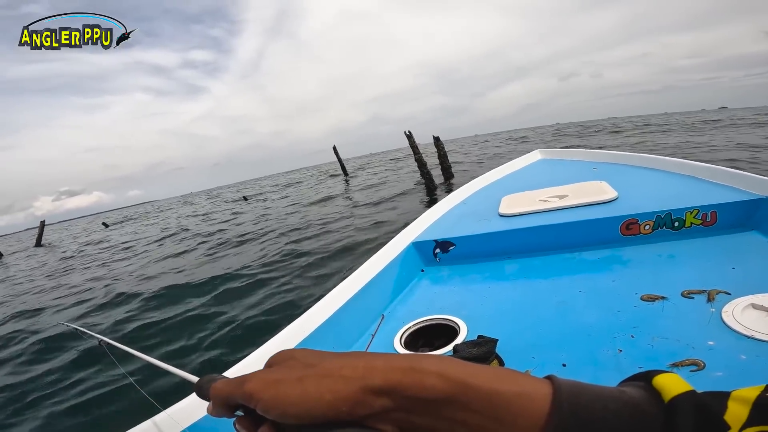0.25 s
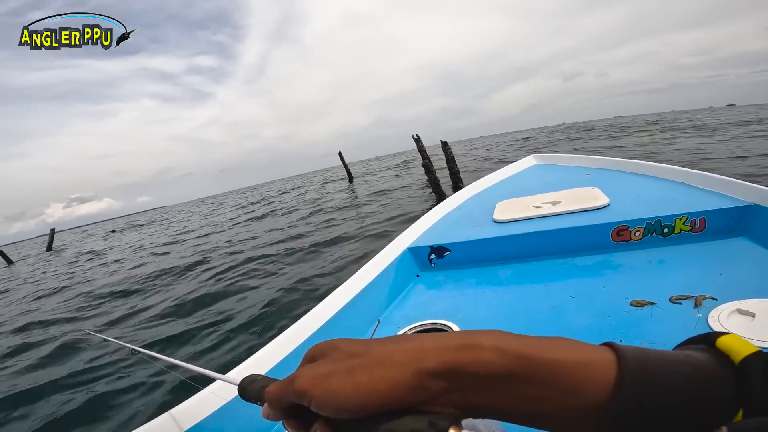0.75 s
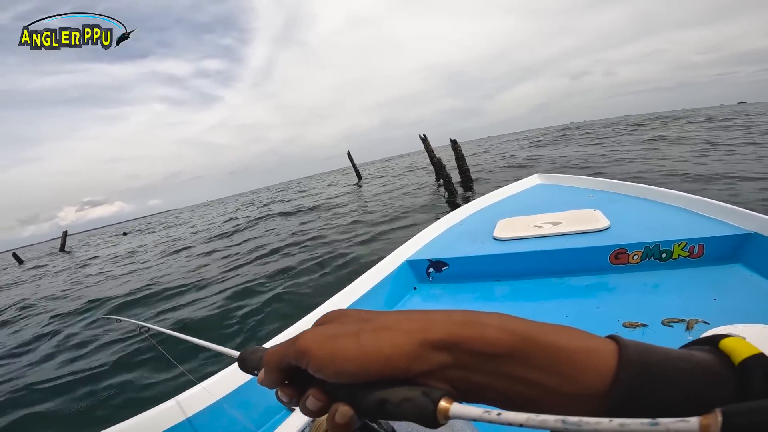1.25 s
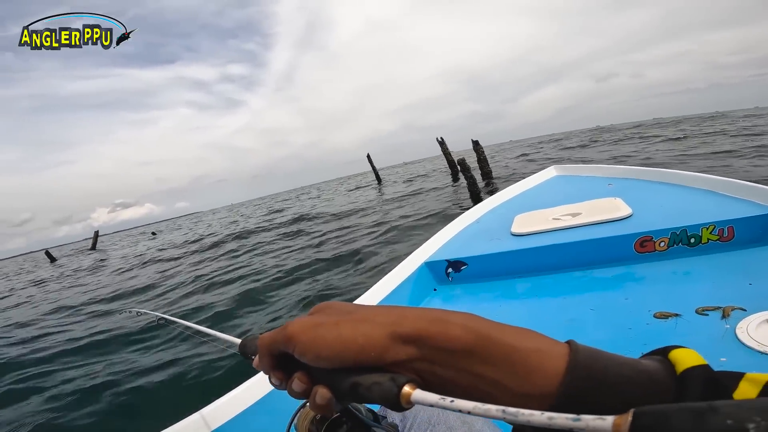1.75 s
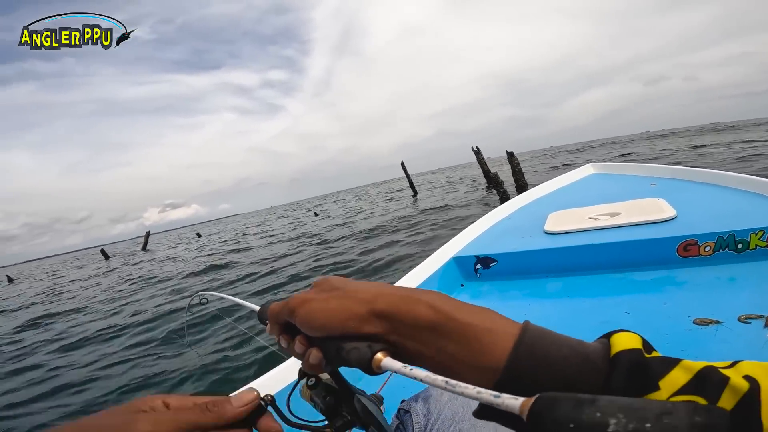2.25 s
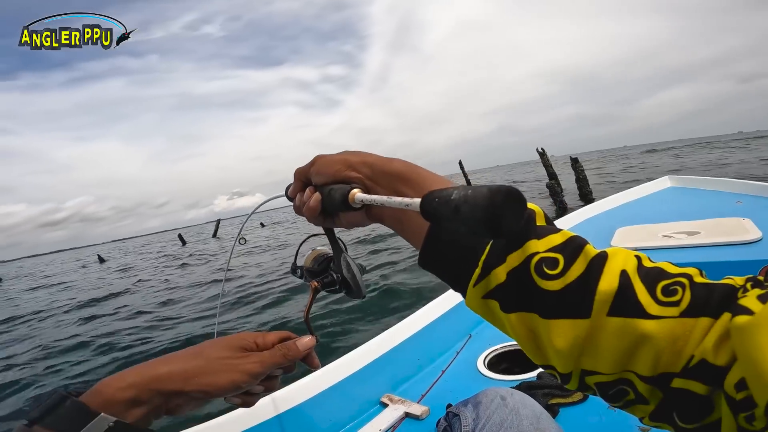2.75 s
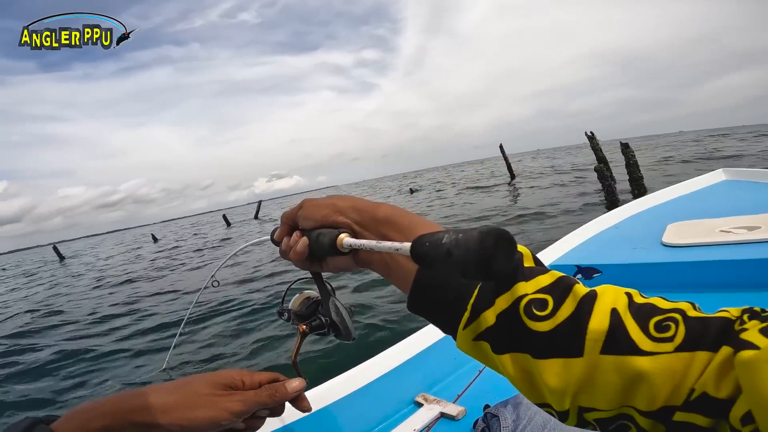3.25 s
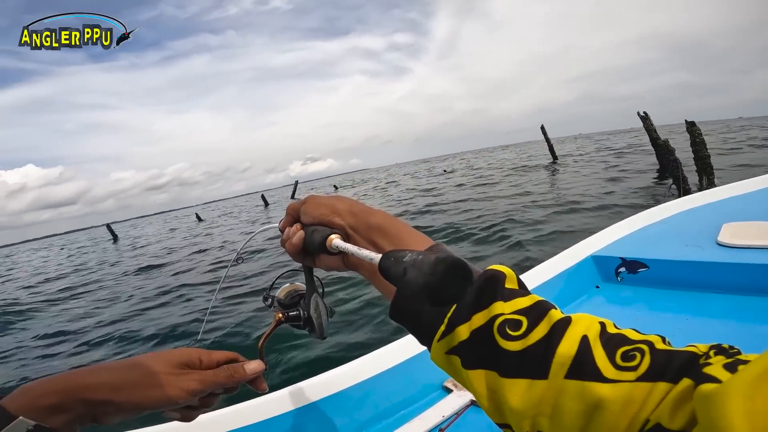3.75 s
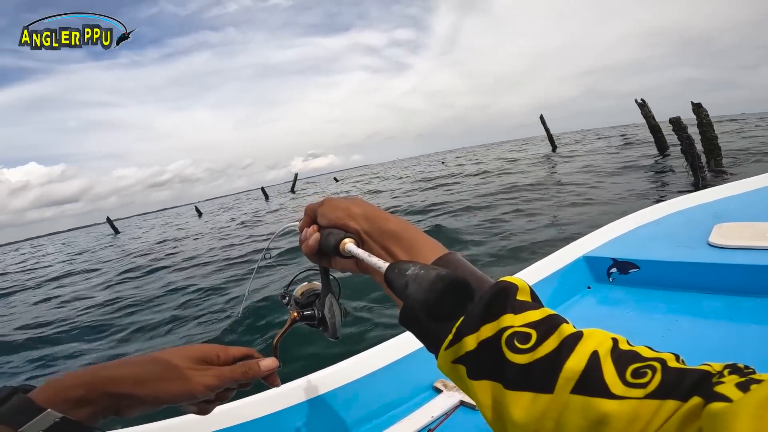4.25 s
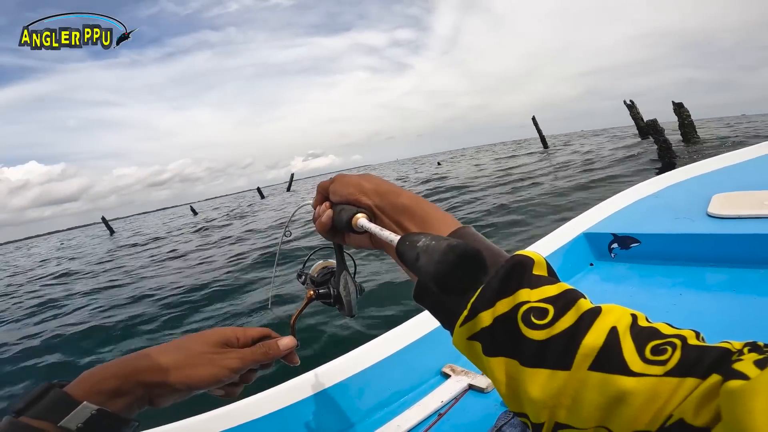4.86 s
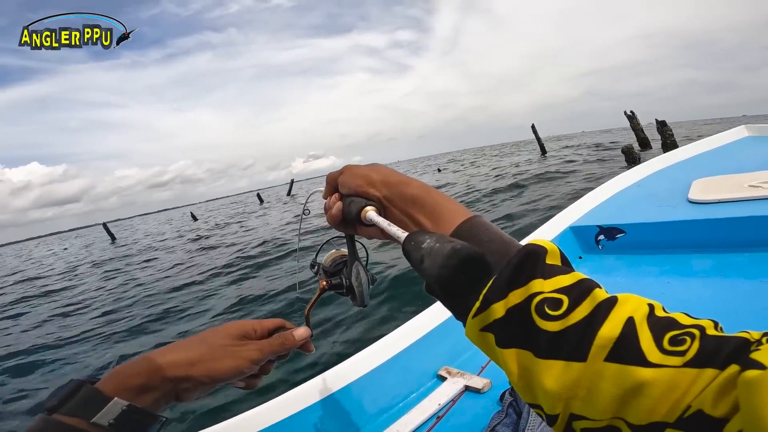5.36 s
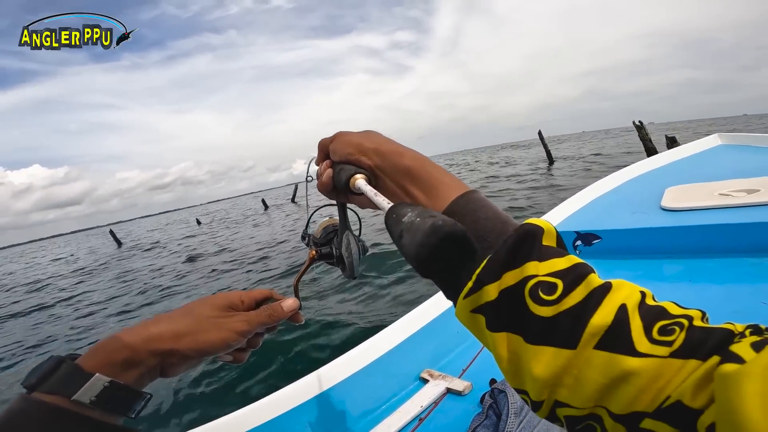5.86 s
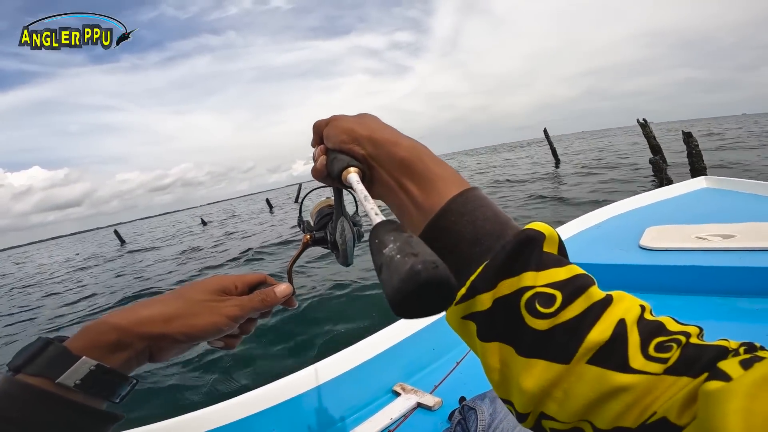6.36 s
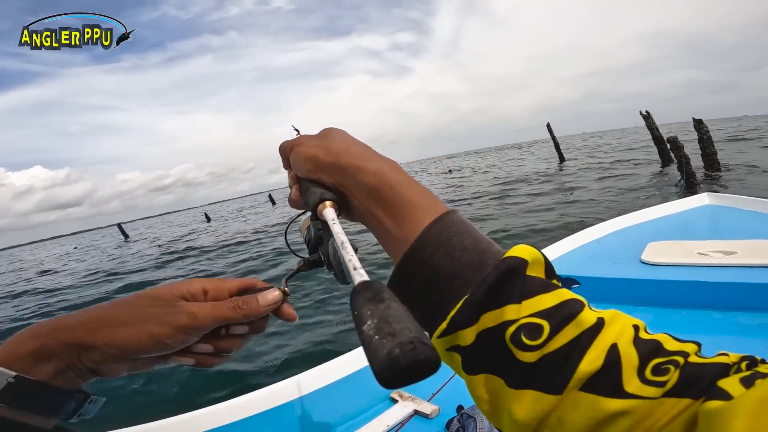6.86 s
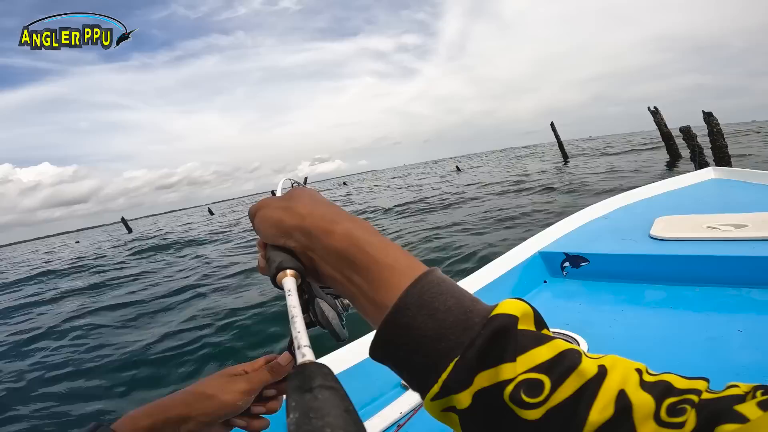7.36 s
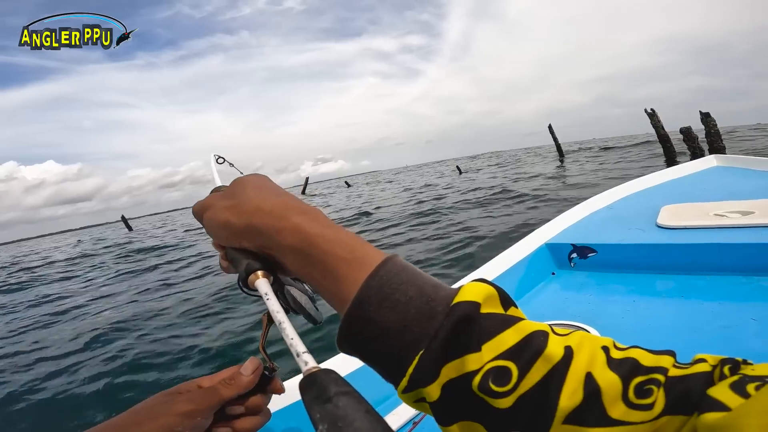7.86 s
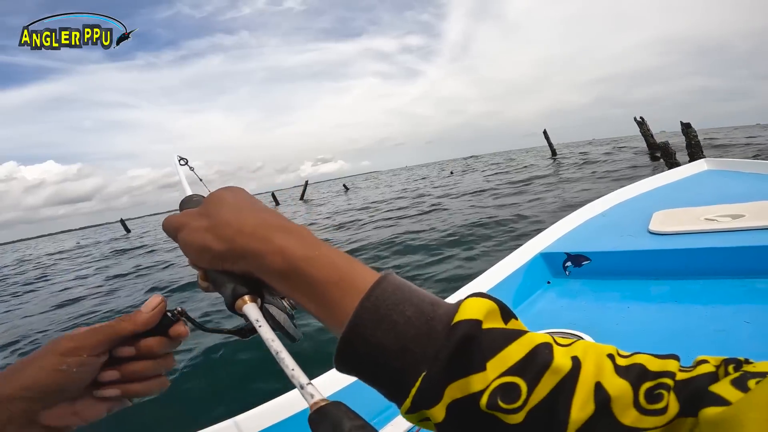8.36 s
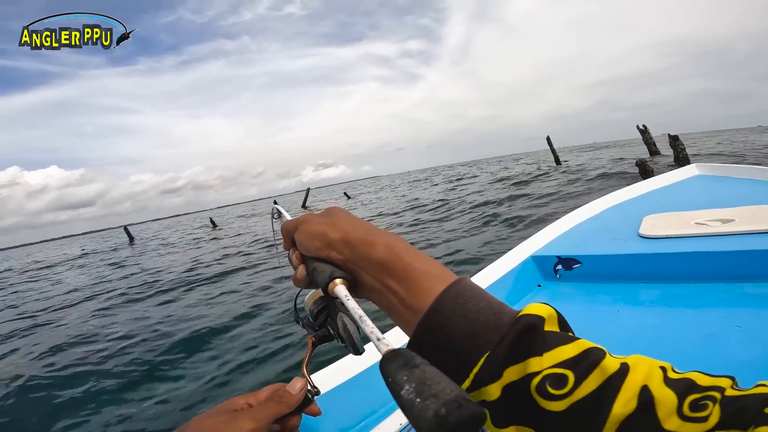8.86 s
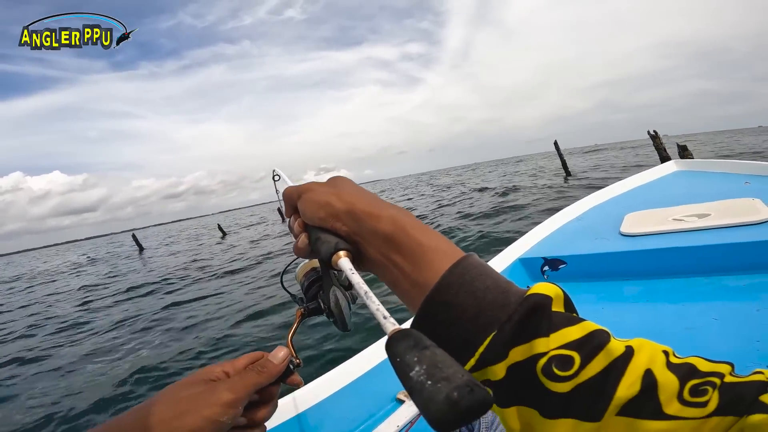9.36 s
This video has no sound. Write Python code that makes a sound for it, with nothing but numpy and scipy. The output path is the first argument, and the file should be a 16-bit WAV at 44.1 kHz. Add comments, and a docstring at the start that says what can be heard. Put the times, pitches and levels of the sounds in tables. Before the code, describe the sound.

Heard from an angler's chest, a fishing reel's drag starts ticking after a quiet opening of water along the hull and small handling knocks. It speeds into a fast, ringing ratchet run, then slips in uneven spurts until near the end. Low gusts of wind thump and flutter on the microphone, while line hiss, short dry scrapes and faint fabric crackle sit over the gentle wash around the small boat.

```python
"""A spinning reel's drag clicks as a hooked fish pulls line, heard at the angler's chest on a small boat.
The pawl snaps over the spool teeth and rings pawl and spool, in fits and in one steady run.
Line hisses through the rod guides, sleeve and ripples crackle, a few things knock and scrape.
Gusts buffet the two microphone ports; water washes along the rocking hull."""
import sys
import numpy as np
from scipy import signal
from scipy.io import wavfile
from scipy.ndimage import uniform_filter1d

SR = 44100
rng = np.random.default_rng(int(sys.argv[2]) if len(sys.argv) > 2 else 0)


def dump(signal):
    """Clip the signal to [-1, 1] and save it as 16-bit WAV at the path in sys.argv[1]."""
    limited = np.clip(np.atleast_2d(signal).T, -1, 1)
    pcm = np.round(limited * 32767).astype(np.int16)
    wavfile.write(sys.argv[1], SR, pcm)


N = 423801
RING_HZ, OVERTONE_HZ = 5373, 6440  # the spool's two longest-ringing modes
SIDE = np.array([[1], [-1]])  # left, right


def undb(db):
    """Level in dB to gain."""
    return 10 ** (np.asarray(db) / 20)


def unit(x):
    """Scale to rms 1."""
    return x / np.sqrt(np.mean(x ** 2))


def curves(table):
    """Columns after time, interpolated per sample."""
    times_s, *columns = np.transpose(table)
    return [np.interp(np.arange(N) / SR, times_s, c) for c in columns]


def ring(x, hz, t60_s):
    """Damped mode driven by x."""
    r, w = np.exp(-np.log(1000) / (t60_s * SR)), 2 * np.pi * hz / SR
    return signal.lfilter([0, r * np.sin(w)], [1, -2 * r * np.cos(w), r * r], x)


def band(x, lo_hz, hi_hz, order):
    """Butterworth band-pass."""
    return signal.sosfilt(signal.butter(order, [lo_hz, hi_hz], "band", fs=SR, output="sos"), x)


def walk(rate_hz):
    """Random steps, smoothed twice; rms 1."""
    hold = int(SR / rate_hz)
    steps = np.repeat(rng.standard_normal(N // hold + 1), hold)
    return unit(uniform_filter1d(uniform_filter1d(steps, hold), hold)[:N])


def ports(x, pan_db, direct):
    """Left and right port; a chest echo reaches them with opposite sign."""
    echo = np.sqrt(1 - direct ** 2) * np.roll(x, 211)
    return undb(SIDE * pan_db / 2) * (direct * x + SIDE * echo)


def sea():
    """Far water: faint steady hiss."""
    return undb(-79) * unit(band(rng.standard_normal((2, N)), 900, 7900, order=2))


def sway():
    """Hull rocking on the swell: deep rumble."""
    return undb(-48) * unit(band(rng.standard_normal(N), 22.6, 45, order=2))


def slosh(level_db):
    """Water along the hull: low wash, swelling unevenly."""
    wash = band(rng.standard_normal((2, N)), 280, 588, order=1)
    mid, side = unit(band(wash, 220, 660, order=2))
    return undb(level_db + 3.44 * walk(30)) * (mid * undb(-1.2 * SIDE) + 0.4 * side * SIDE)


def crackle(level_db):
    """Sleeve folds and ripples: dense uneven grains in half-octave bands."""
    # grain spectrum: (frequency [Hz], level [dB])
    spectrum = [(700, -6), (900, -11.5), (1200, 5), (2000, 1.5), (3500, -3), (5000, -6), (7000, -8),
                (8500, -40), (11000, -38.5), (14000, -31)]
    points_hz, points_db = np.transpose(spectrum)
    out, flurry = 0, walk(20)
    folds = unit((rng.random(N) < 70 / SR) * undb(np.minimum(2.2 * rng.exponential(size=N), 8)))
    for hz in 800 * 2 ** np.arange(0, 4.1, .5):
        onsets = rng.random((2, N)) < 500 / SR
        grain_db = np.minimum(3.7 * rng.exponential(size=(2, N)), 18)
        grains = unit(onsets * undb(grain_db) * rng.standard_normal((2, N)))
        grains[0] += min(hz / 6000, 1) * folds  # folds tick mostly in the treble
        mid, side = band(grains, hz / 1.196, hz * 1.124, order=2)
        band_db = np.interp(np.log(hz), np.log(points_hz), points_db)
        out += undb(band_db + 0.92 * flurry + 4.0 * walk(23)) * (mid + 0.52 * side * SIDE)
    midrange_rms = np.sqrt(np.mean(band(out[0], 1000, 2350, order=2) ** 2))
    return undb(level_db) * out / midrange_rms


def knocks():
    """Knocks and plops: a short rough push on one damped mode each."""
    # impacts: (time [s], level [dB], pitch [Hz], t60 [s])
    impacts = [(0.15, -51, 3000, 0.019), (0.552, -49.5, 1880, 0.016), (0.678, -51, 1780, 0.02),
               (0.73, -46, 3940, 0.0081), (1.2, -31, 1395, 0.025), (1.256, -44, 2010, 0.012),
               (1.31, -52, 1340, 0.02), (1.535, -39.5, 1160, 0.031), (1.594, -40.5, 2330, 0.015),
               (1.718, -48.5, 1870, 0.02), (2.384, -27.5, 2260, 0.011), (2.797, -35.5, 2300, 0.027),
               (2.892, -34, 1540, 0.0066), (4.169, -33, 944, 0.023), (5.556, -42.5, 1830, 0.015),
               (6.55, -42.5, 1100, 0.037), (6.888, -35, 3380, 0.014), (6.951, -39, 1190, 0.015),
               (7.086, -33.5, 905, 0.0083), (8.228, -43, 1570, 0.015), (8.439, -37, 2000, 0.012)]
    out, t = np.zeros(N), np.arange(SR // 8) / SR
    for start_s, db, hz, t60_s in impacts:
        grit = rng.standard_normal(len(t))
        tone = ring(grit * np.exp(-t / 0.0073), hz, t60_s)
        tick = 0.13 * grit * np.exp(-t / .0012)
        out[int(start_s * SR):][:len(t)] += undb(db) * (tone / np.abs(tone).max() + tick)
    return out


def scrapes():
    """Dry scrapes of line and handle: wide-band bursts of grit."""
    # bursts: (time [s], level [dB], centre [Hz], decay [s])
    bursts = [(0.65, -41, 4260, 0.0058), (1.399, -31.5, 5050, 0.005), (1.524, -33, 2220, 0.0045),
              (1.551, -35, 2040, 0.0053), (2.024, -39, 2800, 0.017), (2.2196, -34.5, 2980, 0.0066),
              (4.0397, -21, 5100, 0.015), (4.339, -19.5, 5300, 0.022), (4.85, -21, 5260, 0.0059),
              (7.305, -25.5, 4700, 0.0058), (7.309, -14.5, 5260, 0.0065), (7.397, -29.5, 4500, 0.035),
              (7.535, -31, 4650, 0.034), (8.354, -33.5, 3560, 0.0065), (8.541, -38, 2150, 0.014),
              (8.617, -33.5, 2640, 0.047), (8.892, -33, 5370, 0.0086)]
    out, t = np.zeros(N), np.arange(SR // 8) / SR
    for start_s, db, hz, decay_s in bursts:
        grit = rng.standard_normal(len(t)) * np.exp(-(t / decay_s) ** 2)
        burst = band(grit, 0.44 * hz, 2.0 * hz, order=2)
        out[int(start_s * SR):][:len(t)] += undb(db) * burst / np.abs(burst).max()
    return out


def wind():
    """Eddies on the ports: rumble, plus quicker flutter peaking in short puffs."""
    # gust rumble: (time [s], level [dB])
    gusts = [(0.0, -42.5), (0.24, -50), (2.17, -47.5), (2.51, -58), (2.65, -41), (3.02, -39.5),
             (3.07, -27.5), (3.13, -47.5), (3.79, -44.5), (3.93, -30.5), (4.06, -36.5), (4.2, -19),
             (4.39, -26.5), (4.44, -22), (4.92, -30.5), (4.97, -19.5), (5.13, -39), (5.32, -34),
             (5.37, -21.5), (5.48, -30.5), (5.53, -39.5), (5.67, -23.5), (6.17, -44.5), (6.42, -44),
             (6.5, -28.5), (7.83, -25.5), (7.89, -22.5), (7.99, -23.5), (8.02, -28), (8.34, -22),
             (9.2, -29.5), (9.28, -21.5), (9.55, -50), (9.6, -39)]
    # wind shadow, mostly on the left port: (time [s], rumble left minus right [dB])
    lee = [(0, -3), (.6, 3), (2, -1), (3, -1.5), (3.9, -3.5), (6.2, -3.5), (7.5, -5.5), (9.61, -3.5)]
    # single puffs: (time [s], flutter level [dB])
    puff_peaks = [(4.33, -19.5), (4.458, -20), (4.553, -22.5), (4.7, -29.5), (4.8, -20.5), (5.001, -21),
                  (5.361, -27), (5.63, -23.5), (5.7, -27.5), (5.88, -32.5), (6.939, -31), (7.04, -16.5),
                  (7.085, -20), (7.35, -21), (7.529, -26), (7.692, -24.5), (7.839, -34), (7.917, -17),
                  (7.99, -16.5), (8.063, -19), (8.13, -23.5), (8.201, -32), (8.333, -16.5), (8.381, -15.5),
                  (8.651, -23), (8.719, -26), (8.829, -29), (8.919, -33), (9.147, -20.5), (9.35, -25)]
    puff_decay_s, thump_db = 0.0084, -13.5
    breeze_db, flutter_db_per_db = -62.5, 3.08
    rumble_db, = curves(gusts)
    lee_db, = curves(lee)
    t = np.arange(N) / SR
    eddies, flicker = rng.standard_normal((4, N)), walk(40)
    puffs = np.zeros(N)
    for peak_s, db in puff_peaks:
        near = slice(int((peak_s - .08) * SR), int((peak_s + .08) * SR))
        puffs[near] += undb(db) * np.exp(-np.abs(t[near] - peak_s) / puff_decay_s)
    rumble_gain = undb(rumble_db + 2.53 * flicker) + undb(thump_db) * puffs
    flutter_db = -44.5 + flutter_db_per_db * (rumble_db + 24.5)
    flutter_gain = (undb(breeze_db) + undb(flutter_db)) * undb(3.5 * flicker) + puffs
    mid, side = (unit(band(band(e, 25, 110, order=1), 23, 126, order=2)) for e in eddies[:2])
    rumble = rumble_gain * (mid + 0.18 * side * SIDE)
    mid, side = (unit(band(band(e, 139, 185, order=1), 69, 346, order=3)) for e in eddies[2:])
    flutter = flutter_gain * (mid + 0.055 * side * SIDE)
    return rumble * undb(SIDE * lee_db / 2) + flutter * undb(SIDE * 1.47 * lee_db)


def line_hiss(level_db):
    """Braid rubbing through the guide rings: grainy hiss in their resonances."""
    # guide resonances: (centre [Hz], width [Hz], level [dB])
    guides = [(2330, 200, 6), (4150, 2000, 1.5), (6900, 470, -9)]
    rub = rng.standard_normal(N) * undb(4.5 * walk(120))
    hiss = sum(undb(db) * unit(band(rub, hz - width_hz / 2, hz + width_hz / 2, order=1))
               for hz, width_hz, db in guides)
    slack_db = np.clip(0.34 * (-70 - level_db), 0, 20)  # hiss dies quickly as the line slows
    return ports(undb(level_db - slack_db - 10) * hiss, pan_db=-.8, direct=0.94)


def click_tail(x, gain_db, t60_s):
    """Faint short noisy tail after each click, different at each port."""
    t = np.arange(SR // 10) / SR
    envelope = np.exp(-np.log(1000) * t / t60_s) * (1 - np.exp(-t / .003))
    tail = rng.standard_normal((2, len(t))) * envelope
    return undb(gain_db) * signal.oaconvolve(x[None], tail, axes=1)[:, :N]


def steady_run():
    """Spool turning without a stop: (time [s], snap level [dB]) per tooth."""
    # spool rotation: (time [s], position [teeth])
    rotation = [(2.9684, -5), (3.0452, 0), (3.1278, 5), (3.1855, 11), (3.2627, 18), (3.334, 26),
                (3.4055, 33), (3.4989, 41), (3.534, 43), (3.5902, 47), (3.6367, 51), (3.6565, 52),
                (3.718, 56), (3.783, 62), (3.8752, 69), (3.945, 74), (4.0, 78), (4.0276, 79), (4.069, 83),
                (4.163, 89), (4.2858, 99), (4.3337, 104), (4.449, 118), (4.5388, 130), (4.5995, 136),
                (4.645, 141), (4.8007, 151), (4.8678, 156), (4.9686, 161), (5.0355, 165), (5.0913, 169),
                (5.124, 170), (5.214, 175), (5.2522, 179), (5.3132, 182), (5.3295, 183), (5.356, 184)]
    # off-centre toothed ring, two swells a turn: (position [teeth], snap level [dB])
    runout = [(0, -18), (4.5, -19.5), (7, -34.5), (11, -26.5), (15, -25), (18, -27.5), (21, -32.5),
              (24.5, -25)]
    teeth_per_turn, fade_db_per_s, scatter_db, jitter_s = 26, -2.5, 2.55, .0006
    points_s, passed = np.transpose(rotation)
    tooth = np.arange(passed[0], passed[-1] + 1)
    jitter, scatter = rng.standard_normal((len(tooth), 2)).T
    times_s = np.interp(tooth, passed, points_s) + jitter_s * jitter
    snap_db = np.interp(tooth, *np.transpose(runout), period=teeth_per_turn)
    snap_db += fade_db_per_s * (times_s - times_s[0]) + scatter_db * scatter
    return np.transpose([times_s, snap_db])


def pawl_strikes(modes, onsets, level_db, scatter_db, ring_db=0, overtone_db=0):
    """The pawl lands and bounces once within about 1 ms; each mode takes the blow differently."""
    chance = rng.standard_normal((len(onsets), len(modes), 4))
    out = np.zeros(N)
    for k, (hz, mode_db, t60_s) in enumerate(modes):
        scatter, lag, bounce_lag, polarity = chance[:, k].T
        colour_db = (hz == RING_HZ) * ring_db + (hz == OVERTONE_HZ) * overtone_db
        force = undb(level_db + mode_db + scatter_db * scatter + colour_db)
        blows = np.zeros(N)
        blows[onsets + np.abs(6 * lag).astype(int)] = force
        blows[onsets + (38 + 10 * bounce_lag).astype(int)] += 0.64 * force * np.sign(polarity)
        # light parts radiate little off resonance
        out += band(ring(blows, hz, t60_s), 0.87 * hz, 1.247 * hz, order=1)
    return out


def reel_drag():
    """The pawl snaps over each tooth, ringing pawl and spool; the reel is nearer the left port."""
    # single clicks of the spool slipping in fits, and one faint stray tick at 8.24 s:
    # (time [s], snap level [dB])
    clicks = [(2.482, -38), (2.4962, -16.5), (2.531, -18.5), (2.5444, -13.5), (2.5558, -14.5),
              (2.5656, -27), (2.5744, -31), (2.581, -22.5), (2.5967, -26.5), (2.6072, -32), (2.6311, -30.5),
              (2.7204, -29.5), (2.8031, -30), (2.8394, -28), (2.865, -25.5), (2.8893, -26.5),
              (2.9073, -24.5), (2.9275, -32), (2.9477, -25.5), (5.3868, -24), (5.4106, -24), (5.4385, -24),
              (5.5034, -31.5), (5.5222, -34), (5.5327, -33.5), (5.557, -35), (5.6068, -30.5),
              (5.6778, -35.5), (5.756, -30.5), (5.8116, -29), (5.8507, -25.5), (5.9165, -27), (5.963, -28),
              (5.9775, -26.5), (6.0134, -30.5), (6.0443, -27), (6.0567, -33), (6.0721, -37), (6.108, -30),
              (6.131, -27), (6.1437, -26), (6.1548, -31), (6.198, -20), (6.216, -16), (6.2354, -18.5),
              (6.2964, -23), (6.335, -24), (6.3822, -21.5), (6.4222, -29.5), (6.5015, -37.5),
              (6.5974, -35.5), (6.8262, -33), (6.866, -38.5), (6.8892, -30), (6.9132, -27.5),
              (6.9303, -25.5), (6.9611, -29.5), (6.989, -27.5), (7.015, -38), (7.0367, -28.5), (7.069, -34),
              (7.106, -37), (7.1255, -32.5), (7.1408, -33.5), (7.162, -37), (7.1891, -37.5), (7.223, -37),
              (7.2636, -34.5), (7.2977, -23.5), (7.3179, -17), (7.352, -24), (7.3678, -18.5),
              (7.3793, -21.5), (7.396, -31.5), (7.437, -33), (7.461, -39), (7.4849, -36), (7.5023, -35.5),
              (7.5584, -27), (7.5857, -36.5), (7.6231, -28.5), (7.656, -29), (7.681, -27), (7.7049, -29.5),
              (7.7378, -31.5), (7.865, -32), (8.2383, -44), (8.4313, -37.5), (8.525, -36), (8.6308, -40),
              (8.6713, -37), (8.6974, -34), (8.7525, -33.5), (8.771, -27), (8.7947, -21.5), (8.8285, -29),
              (8.8646, -24), (8.8831, -26.5), (8.9084, -22.5), (8.9333, -24), (8.969, -25), (9.0075, -38)]
    # pawl modes: (frequency [Hz], level [dB], t60 [s])
    pawl_modes = [(8390, -18, 0.015), (10100, -21, 0.029), (11300, -4.5, 0.012), (11170, -9.5, 0.0058),
                  (11405, 0.5, 0.011), (12100, 2.5, 0.015), (11100, -13.5, 0.018), (12200, -7, 0.01),
                  (11680, -3.5, 0.017), (13140, -14, .01), (15200, -31.5, .004)]
    # spool modes: (frequency [Hz], level [dB], t60 [s])
    spool_modes = [(2330, -19.5, 0.0056), (5300, -15, 0.036), (RING_HZ, -13, 0.094), (5510, -2.07, 0.0055),
                   (OVERTONE_HZ, -28, 0.12), (6610, -6.5, 0.0058), (7050, -9, 0.012), (7440, -13.5, 0.014)]
    # click colour under changing grip and tension: (time [s], ring [dB], overtone [dB], pawl [dB])
    colour = [(2.4, -1, 3, -1), (4.4, -1, -1, -0.5), (5.2, 1, -8, -4), (5.35, -6.5, 4.5, -3),
              (6.4, -1.5, 2.5, -4), (6.9, -3, 0, -3), (8.85, -8, -6, 0)]
    times_s, snap_db = np.vstack([clicks, steady_run()]).T
    onsets = (times_s * SR).astype(int) - 12
    # weak snaps still sound the spool
    blow_db = np.minimum(0.53 * snap_db - 11.5, snap_db + 0.5) + 0.96 * rng.standard_normal(len(onsets))
    ring_db, overtone_db, pawl_db = (c[onsets] for c in curves(colour))
    ring_db += 0.223 * (snap_db + 28)  # harder snaps lift the spool free
    pawl = pawl_strikes(pawl_modes, onsets, snap_db + pawl_db - 6, scatter_db=2.5)
    spool = pawl_strikes(spool_modes, onsets, blow_db, scatter_db=2.83,
                         ring_db=ring_db, overtone_db=overtone_db)
    tail = click_tail(pawl + spool, gain_db=-38, t60_s=0.051)
    return ports(pawl, pan_db=4.9, direct=0.96) + ports(spool, pan_db=1.4, direct=0.98) + tail


def scene():
    """Reel, rod and arm close by, wind on the ports, water underneath."""
    # arm, rod and hull activity: (time [s], crackle [dB], line hiss [dB], slosh [dB])
    activity = [(0.0, -71, -76, -78.5), (0.43, -77, -76, -63.5), (0.58, -65.5, -70, -60),
                (1.06, -77.5, -76, -75), (1.55, -55, -54.5, -57.5), (1.83, -69, -75.5, -68),
                (2.3, -57.5, -51, -66), (2.48, -55, -37, -64.5), (2.75, -65.5, -62.5, -69.5),
                (3.25, -59, -44, -72), (3.6, -64.5, -48.5, -70), (3.78, -60.5, -47, -57.5),
                (4.0, -58, -52.5, -62), (4.25, -51, -44, -71), (4.73, -54, -45.5, -45.5),
                (5.3, -55, -53, -54), (5.6, -74, -61, -85), (6.11, -63, -61, -68), (6.76, -66, -70, -82),
                (6.98, -58, -45.5, -62), (7.5, -60, -60.5, -59), (7.8, -63, -63.5, -96),
                (8.0, -58.5, -70, -55), (8.68, -55.5, -47.5, -49), (9.37, -68, -75, -58),
                (9.59, -64.5, -73, -67)]
    crackle_db, line_db, slosh_db = curves(activity)
    mix = sea() + sway() + reel_drag() + wind()
    mix += crackle(crackle_db + 1.5) + line_hiss(line_db) + slosh(slosh_db)
    handling = band(knocks() + scrapes(), 370, 4700, order=1)
    return mix + ports(handling, pan_db=-1.6, direct=0.93)


def record(dry):
    """The microphone housing dulls the high treble; a steep low-pass cuts the top."""
    housing_hz, top_hz = 13300, 16300
    dull = signal.sosfilt(signal.butter(8, housing_hz, fs=SR, output="sos"), dry)
    return signal.sosfilt(signal.ellip(8, .2, 70, top_hz, fs=SR, output="sos"), dull)


dry = scene()
out = record(dry)
dump(out)
```